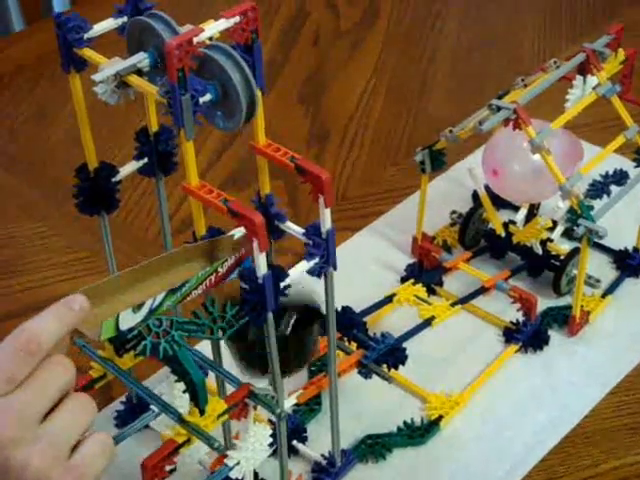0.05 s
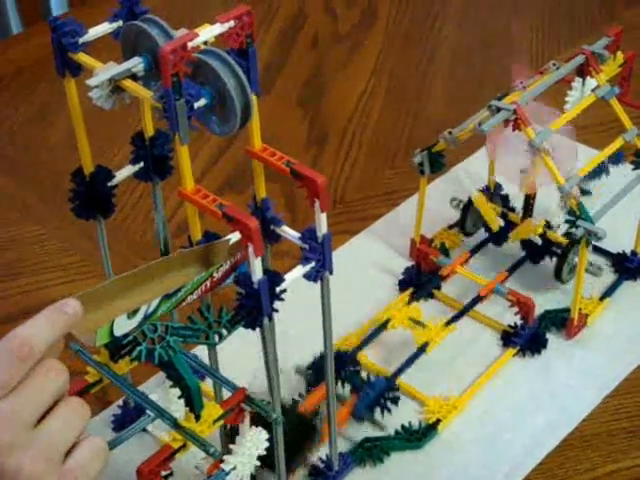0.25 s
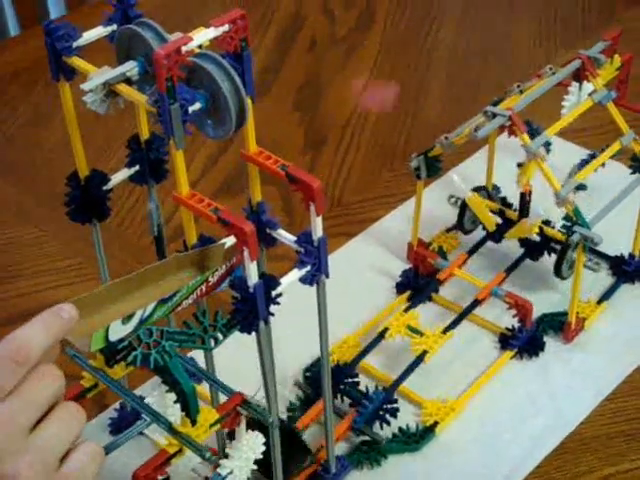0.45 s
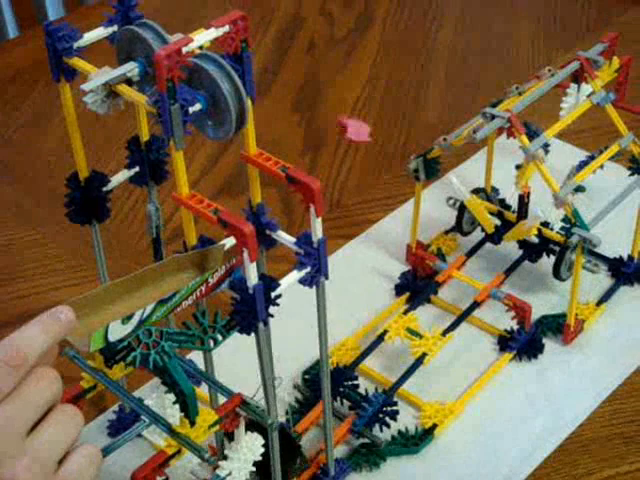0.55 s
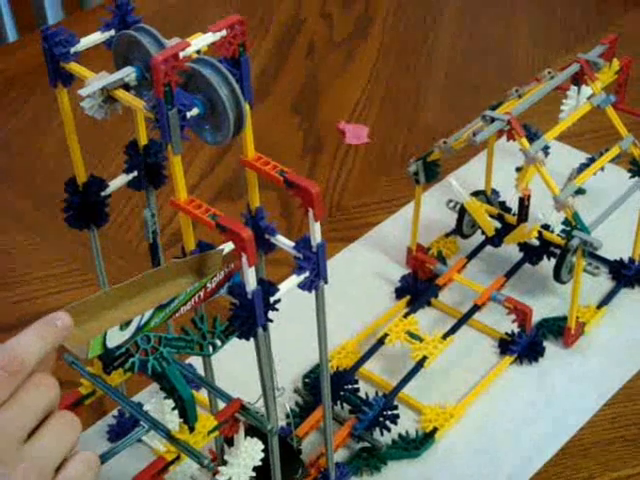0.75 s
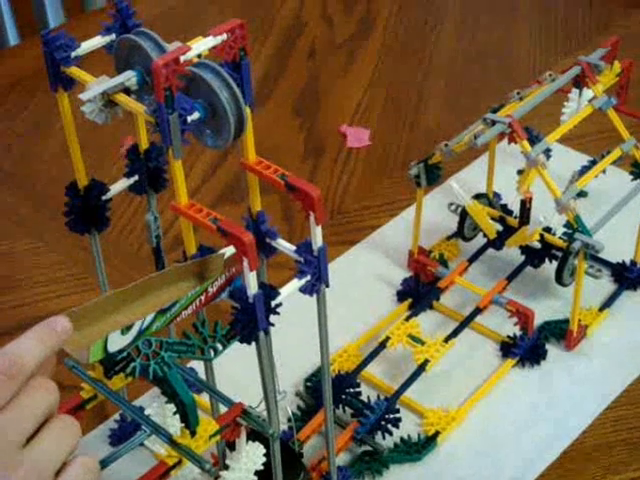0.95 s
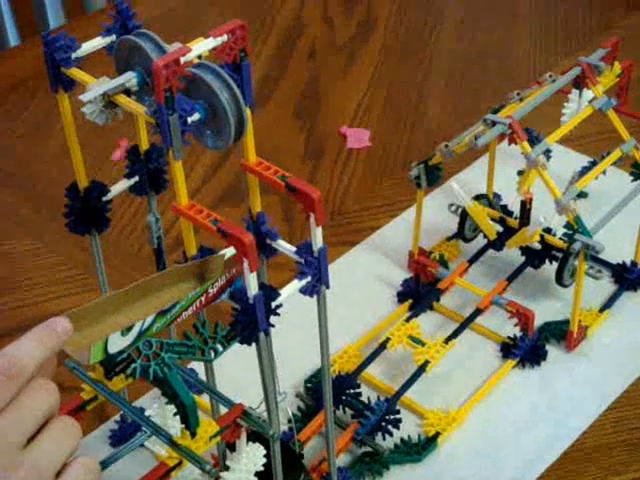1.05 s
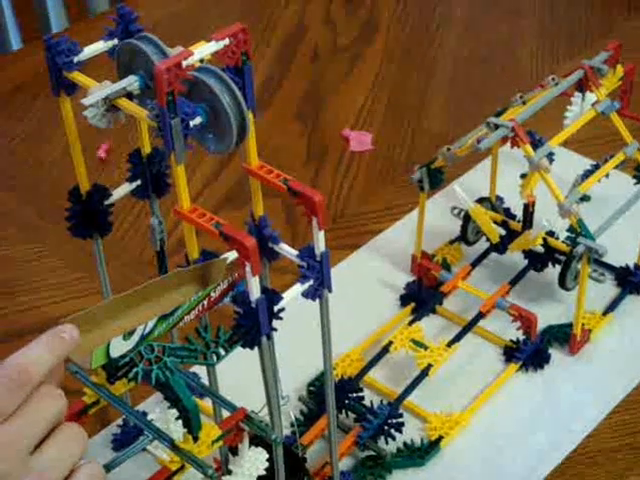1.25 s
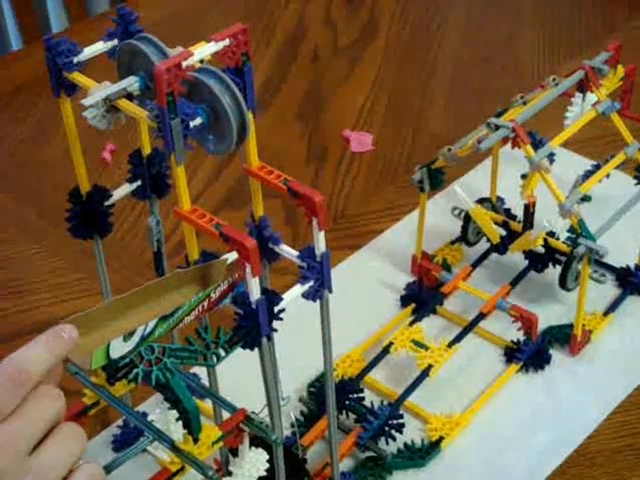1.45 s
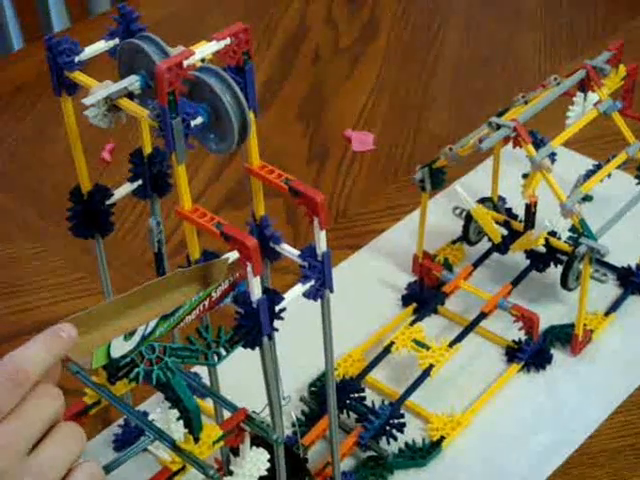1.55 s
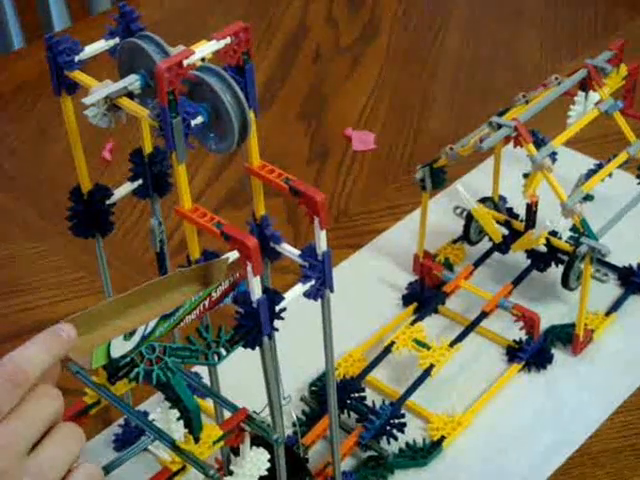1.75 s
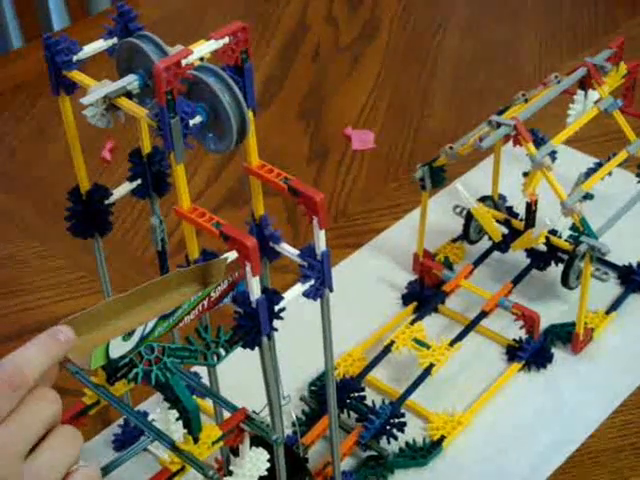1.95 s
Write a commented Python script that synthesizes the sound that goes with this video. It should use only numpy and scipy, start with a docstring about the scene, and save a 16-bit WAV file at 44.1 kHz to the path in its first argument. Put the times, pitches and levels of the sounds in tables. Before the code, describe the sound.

A balloon pop is the main event, at about 0.48 seconds: a sharp snap swelling into a dense half-second room reverberation. Before it, plastic pulley ticks and low table knocks fill the first 0.13 seconds, then a cup crashes at 0.21 and bounces harder at 0.32. Bright, weakening taps follow at 0.79, 0.92 and 1.63. Loud bangs sound flattened; faint hum and room hiss gradually return.

```python
"""Over bare-room tone and a faint appliance hum (filtered noise, wavering lines), a toy of plastic rods on a
wooden table runs: a pulley ticks (decaying modes, low knocks), then a falling cup crashes and bounces
(random hits, resonant thump). A small balloon bursts (snap and pulse, mostly room reverberation), and a
loose piece taps three times more (short noise cracks). The camera's limiter flattens the bangs and its gain
control lets the room tone creep back."""
import sys
import numpy as np
from scipy import signal
from scipy.fft import rfft, irfft, next_fast_len
from scipy.io import wavfile
from scipy.ndimage import uniform_filter1d, minimum_filter1d

SR = 44100
rng = np.random.default_rng(int(sys.argv[2]) if len(sys.argv) > 2 else 0)


def volts_from_decibels(level):
    """Turn decibel levels (scalar or array-like) into linear amplitude factors."""
    exponent = np.asarray(level, float) / 20
    return 10 ** exponent


def master(y):
    """Save y as 16-bit WAV."""
    cut = np.clip(np.atleast_2d(y).T, -1, 1)
    pcm = np.round(cut * 32767)  # scale
    wavfile.write(sys.argv[1], SR, pcm.astype(np.int16))


N = 88200


def unit(x):
    """Scales x to an rms of 1."""
    return x / np.sqrt(np.mean(x ** 2) + 1e-20)


def along(points, hz):
    """Interpolates (frequency [Hz], value) points on a log frequency axis."""
    f, v = np.transpose(points)
    return np.interp(np.log(hz + 1), np.log(f + 1), v)


def coloured(x, points):
    """Causal (minimum-phase) filter of unit energy from (frequency [Hz], level [dB]) points."""
    m = 2 * next_fast_len(len(x) // 2 + 4096)
    gain = volts_from_decibels(along(points, np.fft.rfftfreq(m, 1 / SR)))
    cepstrum = irfft(np.log(np.maximum(gain, 1e-6)), m)
    # folding the cepstrum onto positive time gives minimum phase
    cepstrum[1:m // 2] *= 2
    cepstrum[m // 2 + 1:] = 0
    h = np.exp(rfft(cepstrum))
    size = np.abs(h)
    return irfft(rfft(x, m) * unit(size) * h / size, m)[:len(x)]


def placed(x, start_s):
    """x starting at start_s, in a signal of N samples."""
    return np.pad(x, (round(start_s * SR), N))[:N]


# room decay: (frequency [Hz], t60 [s])
ROOM_DECAY = [(120, 0.38), (250, 0.59), (500, 0.38), (1000, 0.46), (2500, 0.42), (6000, 0.42),
              (14000, 0.41)]
ROOM_BUILD_S = 0.004


def in_room(x, wet_db):
    """x plus a fresh reverberant noise tail that builds up, then dies at a rate set by frequency."""
    hz, t, z = signal.stft(rng.standard_normal(SR), SR, nperseg=256)
    decay = volts_from_decibels(-60 * t / along(ROOM_DECAY, hz)[:, None])
    tail = signal.istft(z * decay, SR, nperseg=256)[1]
    tail *= 1 - np.exp(-(np.arange(len(tail)) / SR / ROOM_BUILD_S) ** 2)
    tail /= np.linalg.norm(tail)
    return x + volts_from_decibels(wet_db) * signal.fftconvolve(x, tail)[:len(x)]


# air noise spectrum: (frequency [Hz], relative level [dB per Hz])
AIR_SPECTRUM = [(18, -45), (30, -42), (70, -26.5), (121, -13.5), (190, -14.5), (245, -8), (300, -9),
                (870, -12.5), (2000, -18), (6200, -27), (9500, -30), (12000, -32), (16000, -28.5)]
# appliance lines: (frequency [Hz], level [dB])
HUM_LINES = [(129.2, -56), (242.2, -52.5), (333.8, -60), (710.6, -62), (834.4, -62), (888.2, -57)]
AIR_RMS_DB, AIR_PATCHY_DB = -45, 1.5
HUM_WIDTH_HZ, HUM_STEADY_SHARE = 5.7, 0.75


def room_tone():
    """Air noise, patchy in time and frequency, with appliance lines: steady sines plus narrow-band noise."""
    z = signal.stft(rng.standard_normal(N), nperseg=512)[2]
    patches = uniform_filter1d(rng.standard_normal(z.shape), 5, 0)
    patches = uniform_filter1d(patches, 10, 1)
    noise = signal.istft(z * volts_from_decibels(AIR_PATCHY_DB * unit(patches)), nperseg=512)[1][:N]
    out = volts_from_decibels(AIR_RMS_DB) * unit(coloured(noise, AIR_SPECTRUM))
    t, f = np.arange(N) / SR, np.fft.rfftfreq(N, 1 / SR)
    for hz, db in HUM_LINES:
        line_gain = 1 / (1 + ((f - hz) / HUM_WIDTH_HZ) ** 2)
        waver = unit(irfft(rfft(rng.standard_normal(N)) * line_gain, N))
        steady = np.sqrt(2) * np.sin(2 * np.pi * (hz * t + rng.random()))
        out += volts_from_decibels(db) * ((1 - HUM_STEADY_SHARE) * waver + HUM_STEADY_SHARE * steady)
    return out


# pulley ticks: (time [s], level [dB], gain of modes above 2 kHz [dB])
PULLEY_TICKS = [(.0014, -29, -21), (0.013, -31.5, 4), (0.0342, -28.5, 4), (.0518, -31, 8),
                (0.0653, -31.5, 11.5), (0.0775, -37, 11), (0.0872, -38, 15.5), (0.1208, -41, 14)]
# plastic frame modes: (frequency [Hz], relative level [dB], t60 [s])
FRAME_MODES = [(1480, 1, .016), (2200, -6, .008), (2900, -10, .006), (3550, -5, .009), (4250, -4, .008),
               (5100, -9, .006), (5900, -11, .006), (6900, -11, .007)]
# low knocks through the table: (time [s], level [dB])
TABLE_KNOCKS = [(0.091, -29), (0.103, -24), (0.12, -26), (0.129, -33)]
TICK_ROOM_DB = -4
KNOCK_HZ, KNOCK_T60_S = 272, 0.03


def pulley():
    """Ticks ring the frame's modes, each slightly detuned, with a noise click; some jolts reach the table."""
    t, out = np.arange(SR // 10) / SR, np.zeros(N)
    for start_s, db, upper_db in PULLEY_TICKS:
        ring = np.zeros(len(t))
        for hz, mode_db, t60_s in FRAME_MODES:
            ring_db = mode_db + upper_db * (hz > 2000) + rng.normal(0, 0.67) - 60 * t / t60_s
            ring += volts_from_decibels(ring_db) * np.sin(2 * np.pi * hz * rng.normal(1, 0.063) * t)
        click = 0.24 * volts_from_decibels(-60 * t / 0.032) * np.diff(rng.standard_normal(len(t) + 1))
        attack = np.clip(t / 0.00095, 0, 1)
        out += placed(volts_from_decibels(db) * (ring + click) * attack, start_s)
    for start_s, db in TABLE_KNOCKS:
        attack = 1 - np.exp(-t * KNOCK_HZ)
        knock = volts_from_decibels(db - 60 * t / KNOCK_T60_S) * np.sin(2 * np.pi * KNOCK_HZ * t) * attack
        out += placed(knock, start_s)
    return in_room(out, TICK_ROOM_DB)


# cup crashes: (time [s], rattle level [dB], rattle length [s], rattle fade [dB],
#               thump peak [dB], thump t60 [s], thump tilt [dB per octave])
CUP_CRASHES = [(0.2105, -6.5, 0.11, 8, 3, 0.18, 6), (0.3153, 2.5, 0.092, 14.5, 10, 0.089, -1)]
# rattle of hard parts: (frequency [Hz], relative level [dB per Hz])
RATTLE_SPECTRUM = [(25, -20.5), (100, -21.5), (200, -18.5), (360, -9.5), (520, -12), (700, -15.5),
                   (1030, -5.5), (1450, -7.5), (2100, -3.5), (3200, -8.5), (5000, -6.5), (8300, -8),
                   (16000, -15)]
# table and cup resonances: (frequency [Hz], width [Hz], relative level [dB])
THUMP_MODES = [(377, 66, -10.5), (578, 28, 1.5), (736, 106, 2), (870, 50, -0.5), (1366, 100, 0),
               (1954, 140, -7), (2300, 130, -10), (4290, 270, -8.5), (7460, 410, -5)]
RATTLE_HITS_PER_S, RATTLE_SPREAD_DB = 14000, 0.4
BLOW_DB, BLOW_T60_S = -1, 0.043  # relative to the rattle
CRASH_ROOM_DB = -6.5


def cup():
    """Dense random hits, strongest in the opening blow, plus a noise thump through table and cup resonances."""
    out, t, f = np.zeros(N), np.arange(SR) / SR, np.fft.rfftfreq(SR, 1 / SR)
    body = 0
    for k, (hz, width_hz, db) in enumerate(THUMP_MODES):
        damping = 1j * f * width_hz
        body = body + (-1) ** k * volts_from_decibels(db) * damping / (hz * hz - f * f + damping)
    for start_s, db, length_s, fade_db, thump_db, t60_s, tilt_db in CUP_CRASHES:
        hits = (rng.random(SR) < RATTLE_HITS_PER_S / SR) * rng.standard_normal(SR)
        hits = hits * volts_from_decibels(RATTLE_SPREAD_DB * rng.standard_normal(SR))
        fade = volts_from_decibels(-fade_db * t / length_s) * np.clip((length_s - t) / 0.005, 0, 1)
        blow = volts_from_decibels(BLOW_DB - 60 * t / BLOW_T60_S)
        attack = np.clip(t / 0.0029, 0, 1)
        rattle = volts_from_decibels(db) * coloured(unit(hits) * (fade + blow) * attack, RATTLE_SPECTRUM)
        tilt = volts_from_decibels(tilt_db * np.log2(f / 1000 + 0.15))
        thump = irfft(rfft(rng.standard_normal(SR) * volts_from_decibels(-60 * t / t60_s)) * body * tilt, SR)
        thump *= volts_from_decibels(thump_db) / np.abs(thump).max()
        out += placed(in_room(rattle + thump, CRASH_ROOM_DB), start_s)
    return out


# direct snap of the skin: (frequency [Hz], t60 [s])
SNAP_MODES = [(2700, .005), (1200, .007)]
# burst pulse spectrum: (frequency [Hz], relative level [dB per Hz])
BURST_SPECTRUM = [(25, -29), (100, -34), (190, -28.5), (240, -14.5), (290, -17.5), (400, -7), (520, -3),
                  (800, 1), (1130, 1.5), (1300, -4), (2200, -6.5), (3200, -14), (6300, -16.5), (9500, -21),
                  (12000, -20), (14000, -19.5), (16000, -9.5)]
POP_S, POP_DB, POP_ROOM_DB, SNAP_DB = 0.4762, 14, 28.5, 18.5


def balloon():
    """The skin snaps and freed air leaves as one pressure pulse; most of what is heard is the room's answer."""
    t = np.arange(SR) / SR
    snap = sum(volts_from_decibels(SNAP_DB - 60 * t / t60_s) * np.sin(-2 * np.pi * hz * t) for hz, t60_s in SNAP_MODES)
    snap = signal.sosfilt(signal.butter(1, 200, 'high', fs=SR, output='sos'), snap)
    pulse = volts_from_decibels(POP_DB) * coloured(1. * (t == 0), BURST_SPECTRUM)
    return placed(snap + in_room(pulse, POP_ROOM_DB), POP_S)


# taps of a loose piece: (time [s], level before a common gain [dB])
LOOSE_TAPS = [(0.7893, -30), (0.9205, -42.5), (1.6306, -54)]
# tap spectrum: (frequency [Hz], relative level [dB per Hz])
TAP_SPECTRUM = [(500, -18), (2500, -2), (4600, 1.5), (7500, -1), (10000, -5), (16000, -12)]
TAP_GAIN_DB, TAP_T60_S, TAP_ROOM_DB = 6.5, 0.045, -3


def taps():
    """Short bright cracks: filtered noise with a fast attack and exponential decay."""
    t, out = np.arange(SR // 2) / SR, np.zeros(N)
    envelope = volts_from_decibels(-60 * t / TAP_T60_S) * np.clip(t / 0.0024, 0, 1)
    for start_s, db in LOOSE_TAPS:
        crack = coloured(rng.standard_normal(len(t)) * envelope, TAP_SPECTRUM)
        out += placed(in_room(volts_from_decibels(db + TAP_GAIN_DB) * crack, TAP_ROOM_DB), start_s)
    return out


def scene():
    """Sums all sources into one channel."""
    return (pulley() + cup() + taps() + balloon() + room_tone())[None]


def roll_off(x):
    """The treble ends steeply here."""
    return signal.sosfilt(signal.butter(12, 16650, fs=SR, output="sos"), x)


# microphone treble step and band limit: (frequency [Hz], relative gain [dB])
MIC_RESPONSE = [(9000, 1), (10300, -8), (15600, -9.5), (16000, -37), (16400, -100)]
DUCK_FROM_DB, DUCK_DB_PER_DB, DUCK_BACK_S, DUCK_AHEAD_S = -20, 0.42, 0.63, 0.01
CEILING_DB, LOOKAHEAD_S, LIMIT_BACK_DB_PER_S = 3, 0.004, 204
CLIP_KNEE, BAND_HZ = 3.6, 16000  # knee: exponent, higher is harder


def record(dry):
    """Microphone colour, slowly returning gain control, look-ahead limiter, soft clipping, band limit."""
    t, x = np.arange(N) / SR, coloured(dry[0], MIC_RESPONSE)

    level_db = 10 * np.log10(np.abs(uniform_filter1d(x ** 2, 441)) + 1e-12)
    level_db = -minimum_filter1d(-level_db, 2 * round(DUCK_AHEAD_S * SR) + 1)  # running maximum
    duck_db = DUCK_DB_PER_DB * np.maximum(level_db - DUCK_FROM_DB, 1e-3)
    # peak hold whose dB value decays exponentially
    held = np.maximum.accumulate(np.log(duck_db) + t / DUCK_BACK_S)
    x = x * volts_from_decibels(-np.exp(held - t / DUCK_BACK_S))

    over_db = np.maximum(20 * np.log10(np.abs(x) + 1e-9) - CEILING_DB, 0)
    size = max(round(LOOKAHEAD_S * SR), 1)
    release_db = LIMIT_BACK_DB_PER_S * t
    ahead_db = -minimum_filter1d(-over_db, 2 * size + 1) + release_db
    cut_db = uniform_filter1d(np.maximum.accumulate(ahead_db) - release_db, size)
    x = x * volts_from_decibels(-cut_db)

    clipped = x / (1 + np.abs(x) ** CLIP_KNEE) ** (1 / CLIP_KNEE)
    in_band = np.fft.rfftfreq(N, 1 / SR) < BAND_HZ
    mix = irfft(rfft(clipped) * in_band, N)[None]
    return roll_off(mix)


dry = scene()
out = record(dry)
master(out)
```